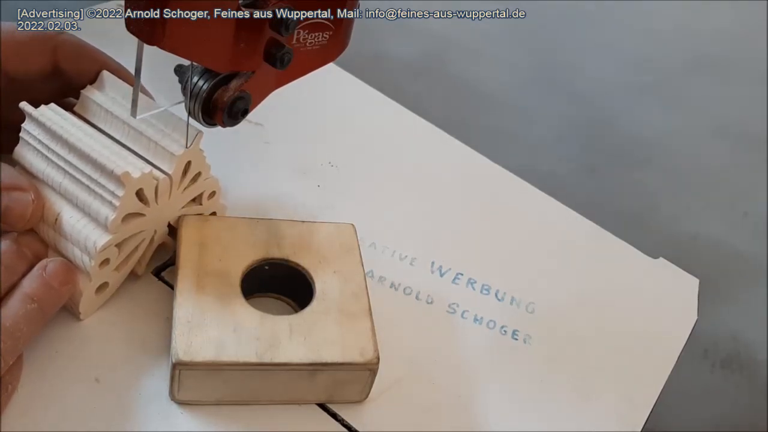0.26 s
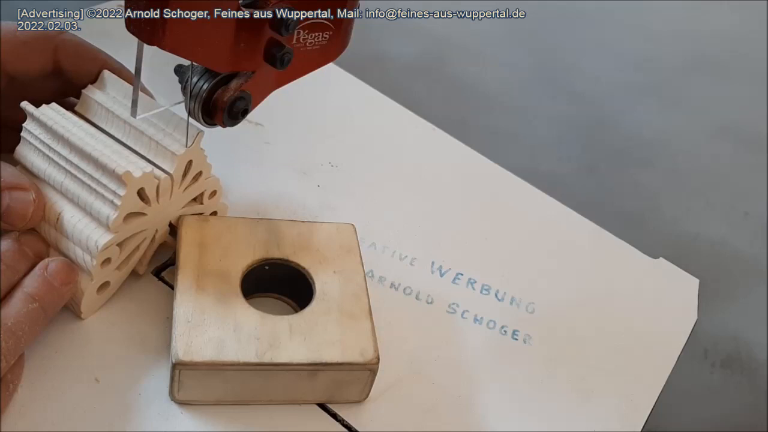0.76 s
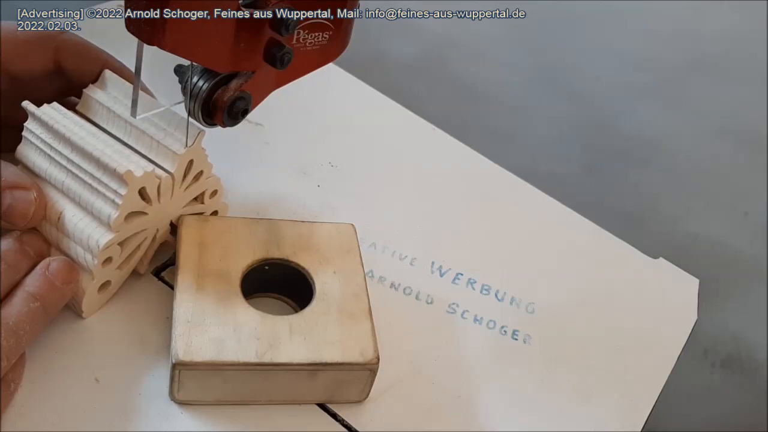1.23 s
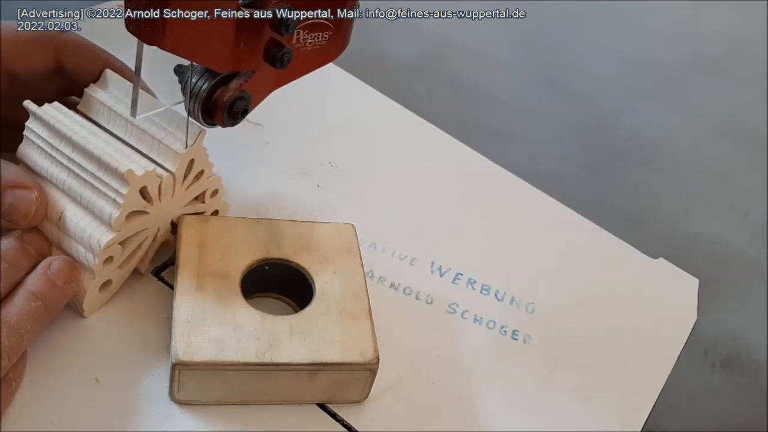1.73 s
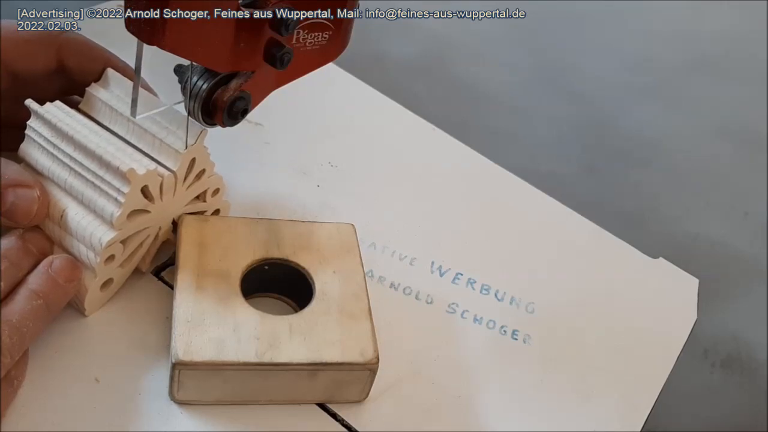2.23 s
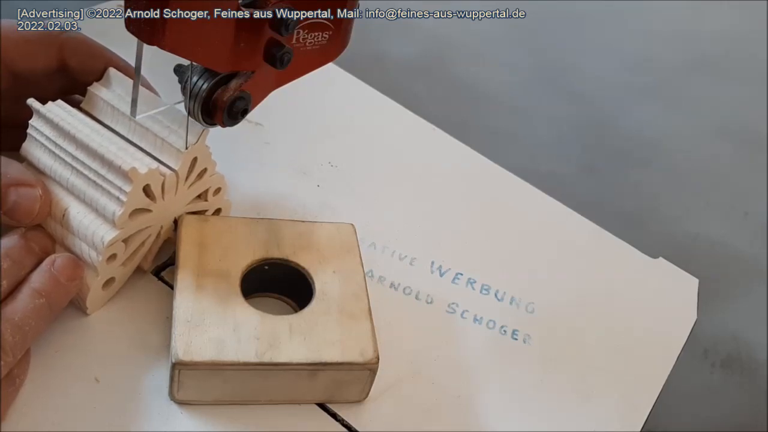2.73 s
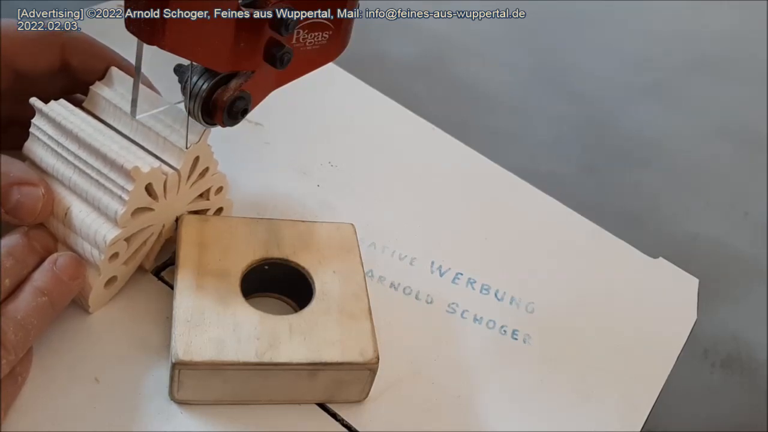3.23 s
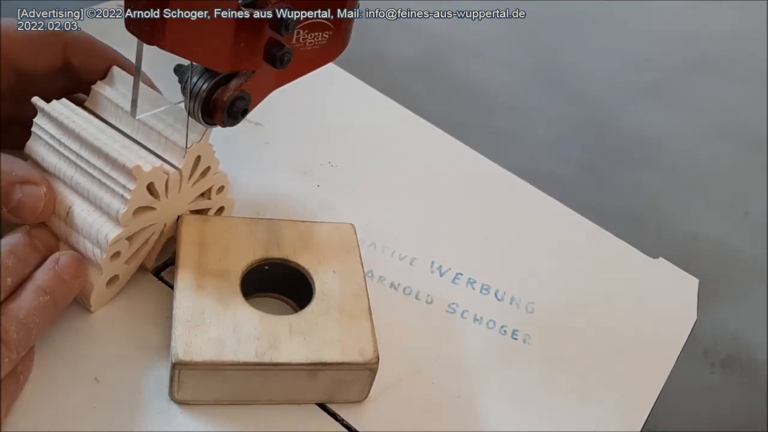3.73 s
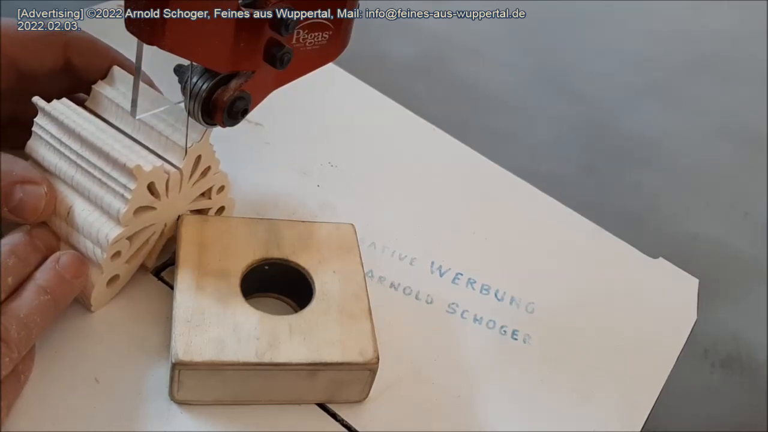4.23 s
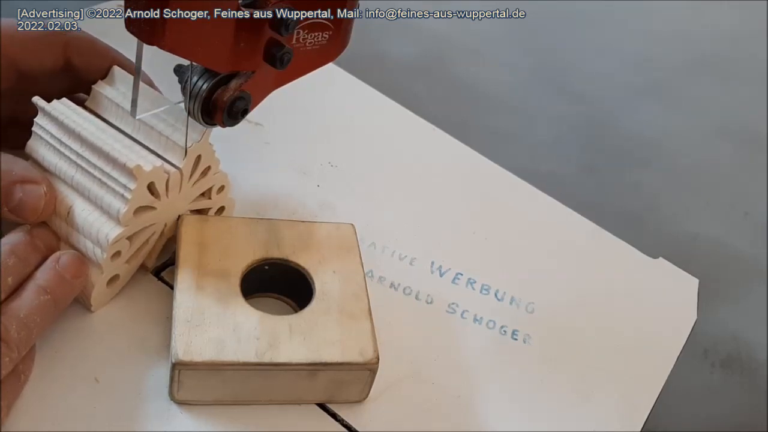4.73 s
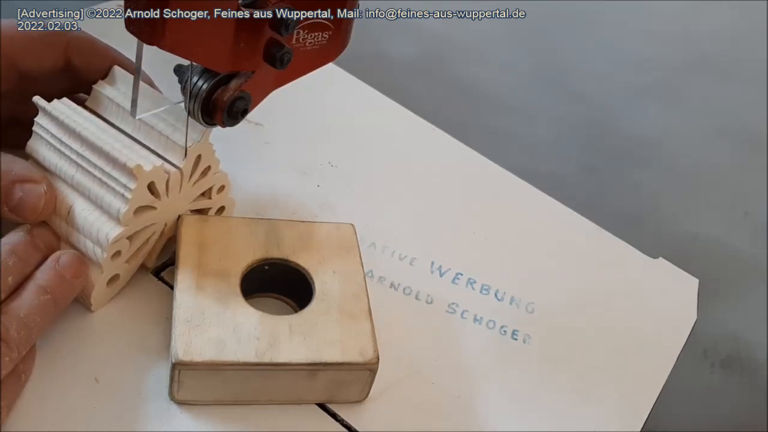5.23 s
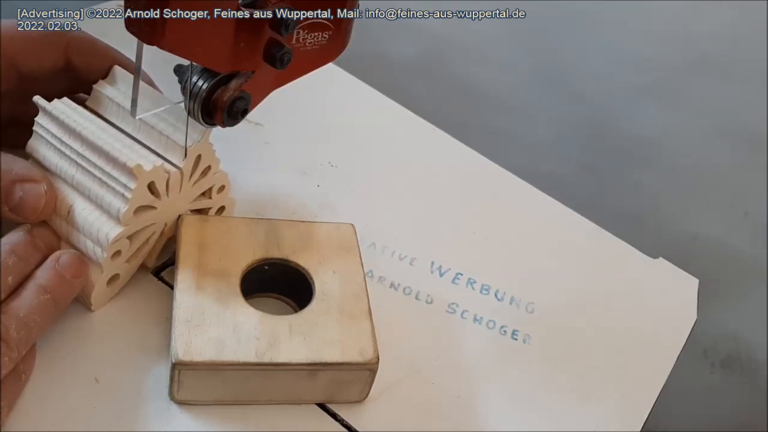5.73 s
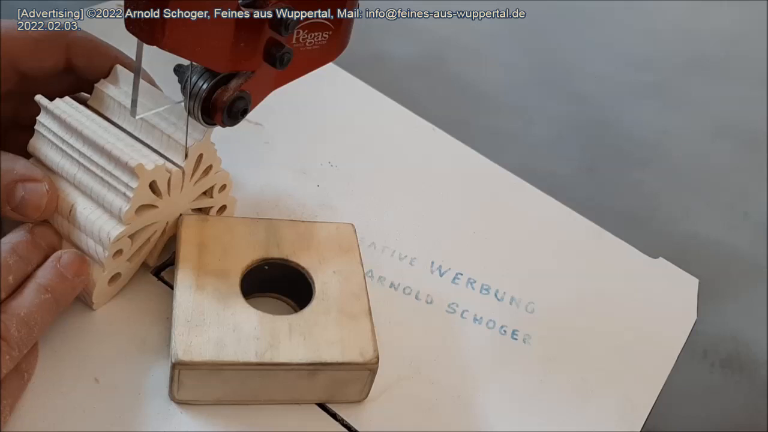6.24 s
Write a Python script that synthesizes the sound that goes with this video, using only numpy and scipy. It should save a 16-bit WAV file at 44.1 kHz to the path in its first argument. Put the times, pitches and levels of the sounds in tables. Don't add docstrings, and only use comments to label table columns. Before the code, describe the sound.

Harsh, gritty sawing starts at once, dense in the high range and with little bass, pulsing fast with the blade guide and broken by irregular tooth bites. Wood taps the table and the frame gives faint low thuds. The cut fades, the saw whirs and hums unloaded with a few clearer knocks, then a short new cut tears in with chirps. Close and dry, slightly gritty phone sound in a workshop.

```python
import sys
import numpy as np
from scipy import signal
from scipy.fft import rfft, irfft, next_fast_len
from scipy.io import wavfile
from scipy.ndimage import uniform_filter1d

SR = 44100
rng = np.random.default_rng(int(sys.argv[2]) if len(sys.argv) > 2 else 0)


def master_out(mix):
    frames = np.transpose(np.atleast_2d(mix))
    ceiling = np.clip(frames, -1, 1)
    pcm = np.round(ceiling * 32767).astype(np.int16)
    wavfile.write(sys.argv[1], SR, pcm)


def volts_from_db(level):
    exponent = np.asarray(level, float) / 20
    return 10 ** exponent


N = 285761
FFT_LEN = next_fast_len(N)
TIME_S = np.arange(N) / SR
FREQ_HZ = np.arange(FFT_LEN // 2 + 1) * SR / FFT_LEN

# (time [s], tooth pressure [dB], solid wood in kerf [dB])
FEED = [(0.0, -15.5, -3), (0.06, -22.5, 0), (0.5, -24, 1.5), (0.85, -21, 0.5), (1.7, -21, 1),
        (1.87, -19.5, -1), (1.98, -21, 0), (2.3, -20, 0), (2.85, -20.5, 0), (3.4, -18.5, -5.5),
        (3.95, -20, -8), (4.2, -25.5, -6), (4.45, -29.5, -10), (4.7, -38.5, -7.5), (6.225, -33.5, -6),
        (6.25, -24.5, -4.5), (6.38, -29, 2), (6.48, -30.5, -2)]
# (time [s], contact [0-1])
CONTACT = [
    (4.5, 0.24),
    (4.75, 0.49),
    (6.2, 0.5),
    (6.24, 0.98),
]
# (time [s], level [dB], half length [s])
BITES = [(0.037, -23, 0.0093), (0.09, -23.1, 0.0063), (0.24, -18.5, 0.0073), (0.347, -19, 0.0055),
         (0.412, -27.5, 0.0187), (0.49, -22.5, 0.013), (0.55, -26, 0.0097), (0.643, -25, 0.011),
         (0.709, -22, 0.0091), (0.887, -19.5, 0.012), (0.927, -19, 0.013), (1.025, -21.5, 0.0132),
         (1.069, -29, 0.0117), (1.116, -21, 0.012), (1.222, -19, 0.015), (1.307, -19.5, 0.0047),
         (1.395, -24.5, 0.018), (1.424, -28, 0.0059), (1.459, -22.5, 0.022), (1.589, -21, 0.0077),
         (1.722, -21.5, 0.01), (1.789, -22.5, 0.012), (1.859, -20.5, 0.021), (1.943, -27, 0.007),
         (2.038, -20.5, 0.022), (2.105, -19, 0.014), (2.159, -20.5, 0.01), (2.245, -18.5, 0.019),
         (2.343, -19, 0.0093), (2.449, -24, 0.015), (2.509, -21.5, 0.0096), (2.545, -22, 0.017),
         (2.633, -19, 0.0085), (2.716, -21, 0.013), (2.784, -18.5, 0.0072), (2.826, -21, 0.016),
         (2.856, -27, 0.0058), (2.949, -14.5, 0.0069), (2.987, -18, 0.0065), (3.075, -18, 0.016),
         (3.156, -20.5, 0.012), (3.218, -18, 0.011), (3.291, -19.5, 0.013), (3.333, -19.5, 0.0081),
         (3.422, -19.5, 0.0066), (3.461, -20, 0.0096), (3.492, -19.5, 0.012), (3.571, -18.5, 0.015),
         (3.733, -25, 0.01), (3.873, -23, 0.017), (3.93, -25, 0.0122), (3.997, -21, 0.014),
         (4.211, -28, 0.0103), (4.242, -30, 0.0064), (4.732, -30, 0.0097), (5.378, -31, 0.013),
         (5.53, -27.7, 0.009), (6.261, -23.5, 0.011), (6.325, -22.5, 0.007), (6.445, -28, 0.014)]
# (time [s], level [dB], half length [s])
SQUEALS = [(0.026, -23, 0.0075), (0.088, -30, 0.0067), (0.122, -29, 0.0096), (0.168, -21, 0.0067),
           (0.243, -19.5, 0.0086), (0.314, -17, 0.0088), (0.387, -20.5, 0.01), (0.493, -27, 0.015),
           (0.559, -24, 0.009), (0.653, -20.5, 0.011), (0.711, -17.5, 0.01), (0.784, -27, 0.025),
           (0.88, -27, 0.016), (0.922, -19.5, 0.014), (1.03, -21, 0.012), (1.123, -21.5, 0.0179),
           (1.222, -18, 0.012), (1.306, -21.5, 0.0062), (1.378, -23, 0.0149), (1.421, -22, 0.0061),
           (1.45, -21, 0.015), (1.588, -24, 0.0071), (1.728, -28, 0.021), (1.858, -17, 0.0099),
           (2.053, -22, 0.022), (2.099, -18, 0.0097), (2.23, -24, 0.019), (2.337, -26, 0.0119),
           (2.392, -31, 0.013), (2.441, -22, 0.0099), (2.48, -24, 0.0068), (2.524, -21, 0.0103),
           (2.642, -22.5, 0.0189), (2.819, -22, 0.039), (2.892, -21, 0.0091), (2.998, -24, 0.027),
           (3.059, -21, 0.022), (3.155, -22.4, 0.023), (3.192, -29, 0.0079), (3.228, -21, 0.0081),
           (3.261, -22, 0.0088), (3.34, -21, 0.011), (3.416, -29, 0.02), (3.466, -22, 0.011),
           (3.53, -21, 0.0082), (3.6, -23, 0.024), (3.655, -21.5, 0.013), (3.77, -22, 0.019),
           (3.826, -27, 0.0098), (3.87, -21.5, 0.0068), (3.915, -21.5, 0.013), (3.987, -21.5, 0.0092),
           (4.068, -25, 0.01), (4.112, -20.5, 0.0097), (4.182, -29.3, 0.0257), (4.292, -34, 0.021),
           (6.205, -33, 0.012), (6.289, -23, 0.027), (6.334, -26, 0.0099), (6.425, -28, 0.0073)]
# (time [s], level [dB], half length [s])
SPRAYS = [(0.025, -19, 0.0072), (0.094, -27, 0.0079), (0.164, -21.5, 0.024), (0.264, -16.5, 0.0095),
          (0.318, -23, 0.0104), (0.384, -21, 0.014), (0.49, -23, 0.0178), (0.552, -23, 0.012),
          (0.652, -18.5, 0.011), (0.705, -16.5, 0.0113), (0.89, -15.5, 0.022), (0.943, -22, 0.0171),
          (1.036, -18.5, 0.0167), (1.12, -17.5, 0.022), (1.214, -18.5, 0.017), (1.281, -18, 0.0061),
          (1.356, -22, 0.0066), (1.382, -19, 0.0072), (1.424, -20, 0.033), (1.525, -17.5, 0.0058),
          (1.572, -19.5, 0.0145), (1.648, -21.5, 0.0073), (1.708, -19.5, 0.0071), (1.765, -17.5, 0.016),
          (1.821, -24, 0.0104), (1.861, -17.5, 0.011), (2.022, -14, 0.0089), (2.095, -20, 0.014),
          (2.138, -16.5, 0.0081), (2.239, -20, 0.021), (2.34, -23, 0.007), (2.372, -24, 0.0085),
          (2.435, -18, 0.012), (2.507, -21, 0.04), (2.648, -19, 0.012), (2.713, -19.5, 0.0091),
          (2.783, -18.4, 0.011), (2.832, -19, 0.015), (2.947, -19, 0.019), (2.986, -18, 0.0063),
          (3.081, -20.5, 0.024), (3.156, -20, 0.0105), (3.182, -14, 0.0049), (3.228, -17, 0.013),
          (3.307, -22, 0.0074), (3.364, -21, 0.0081), (3.46, -18, 0.017), (3.492, -17, 0.0058),
          (3.56, -19, 0.016), (3.633, -22, 0.0097), (3.698, -15.5, 0.0068), (3.791, -17, 0.0085),
          (3.871, -20.5, 0.0073), (3.931, -23, 0.018), (3.994, -20, 0.0122), (4.051, -24.7, 0.02),
          (4.108, -19, 0.0075), (4.212, -28, 0.0232), (6.289, -17, 0.043), (6.424, -26, 0.0118)]
# (frequency [Hz], level [dB per Hz])
CUT_COLOUR = [(200, -85), (600, -23.5), (1300, -25.5), (1950, -21), (2500, -25), (2900, -28.5),
              (3300, -21.5), (3700, -12.5), (4100, -10.5), (4500, -16.5), (4850, -19), (5300, -15.5),
              (5750, -12.5), (6200, -10), (7500, -8.5), (11500, -12), (12500, -16.5), (14300, -13),
              (15500, -12)]
# (frequency [Hz], width [Hz], level against colour [dB])
CUT_MODES = [(3590, 100, 7), (3660, 35, 6), (3730, 35, 8), (3810, 60, 4), (1520, 70, 2), (1980, 70, -2),
             (11800, 150, -3), (4530, 50, 1), (4940, 45, 1), (5260, 120, -3), (6410, 50, 0), (6940, 130, 0),
             (7430, 60, -3), (7770, 50, -2), (10990, 80, -2), (11375, 140, -1), (13550, 180, -4),
             (15269, 11, 3)]
# (frequency [Hz], half width [Hz], level in solid wood [dB], slope [dB per dB of wood])
KERF = [(2410, 110, 2, -0.1), (3604, 70, 2, 0.4), (4280, 130, 0.1, 0.3), (2200, 50, -3, .3),
        (2650, 60, -4, .2), (3220, 60, -5, .1), (4150, 55, -7, .2), (4840, 55, -6, .6), (5870, 80, -7, -.3),
        (6400, 85, 1, -0.2), (7180, 380, 0.4, -0.4), (11260, 160, -1.5, -0.7), (11650, 150, 4, 0.7),
        (13000, 350, -0.2, -0.6), (13570, 200, 2.5, -0.2), (14500, 330, -3.5, -0.9),
        (15100, 150, 1.5, -0.5)]
# (frequency [Hz], half width [Hz], level [dB])
FRESH_KERF = [(1140, 320, 1.5), (3210, 200, 11), (4150, 70, -5), (5170, 130, 2.5), (6800, 140, 2),
              (7750, 170, -8), (10400, 150, 5.5), (11400, 550, -7), (14000, 300, 2.5), (15270, 120, -9)]
# (from [Hz], to [Hz], level in solid wood [dB], slope [dB per dB of wood])
GAPS = [(2100, 3350, 1.43, 0.27), (4250, 5150, 0.5, 0.28), (5150, 6000, 1.46, 0.2),
        (12500, 15750, 0.5, 0.27)]
NOTCH_GAP = 7950, 9330, 6.8, 2.05
# (time [s], gain [dB])
GAIN = [
    (0.0, 0.5),
    (0.8, 0.5),
    (1.6, -0.9),
    (3.2, -0.7),
    (4.2, -1.5),
    (5.2, 1.5),
    (5.6, 4),
    (6.0, 5),
    (6.22, 5),
    (6.34, -1.5),
]
# (frequency [Hz], level [dB per Hz])
WHEEL_COLOUR = [(250, -75), (700, -20.5), (1300, -12.5), (1900, -12), (2500, -14.5), (3250, -8.5),
                (4100, -7), (4500, -8), (6300, -5), (7600, -5.5), (9900, 0), (11000, -10), (12400, -9.5),
                (13000, -3.5), (13500, -11.5), (14300, -3.5), (15500, -12)]
# (frequency [Hz], width [Hz], level against colour [dB])
WHEEL_MODES = [(950, 40, -2), (2008, 9, 6), (3630, 170, 1), (6490, 150, -3), (6950, 100, -2),
               (7290, 120, -2), (11300, 110, -2), (11810, 60, -2), (12080, 150, -1), (13100, 300, -6),
               (13800, 200, -3), (14290, 110, 2), (15090, 100, 2)]
# (frequency [Hz], level [dB per Hz])
MOTOR_COLOUR = [(60, -80), (130, -13.5), (200, -14.5), (260, -9), (320, -6.5), (450, -2.5), (670, -11),
                (1200, -32), (2500, -42.5)]
# (frequency [Hz], width [Hz], level against colour [dB])
HOUSING_MODES = [(200, 4, 13), (313, 16, 5)]
# (frequency [Hz], level [dB per Hz])
FRAME_COLOUR = [(20, -42), (50, -14.5), (100, -9), (170, 0), (220, -3.5), (320, -16), (600, -84)]
# (time [s], peak [dB], pitch [Hz])
KNOCKS = [(0.234, -27.5, 428), (0.637, -26.5, 323), (1.194, -30, 313), (1.334, -29, 320), (1.616, -30, 487),
          (1.828, -26, 355), (2.022, -25.5, 536), (2.088, -31, 525), (2.504, -26.5, 375), (2.827, -27, 478),
          (2.981, -31, 501), (3.072, -24.5, 525), (3.195, -28, 410), (3.302, -30, 407), (3.485, -29, 418),
          (4.889, -31, 340), (5.427, -23, 326), (5.503, -29, 345), (5.597, -21, 317), (5.813, -26, 409),
          (5.989, -26, 266), (6.098, -30, 310), (6.245, -23, 412), (6.395, -28, 345)]
# (time [s], peak [dB], pitch [Hz])
THUMPS = [(0.427, -50, 90), (0.602, -50, 75.4), (0.706, -51, 53.8), (1.184, -50, 90), (1.387, -50, 80),
          (1.835, -51, 80.76), (3.847, -48, 80.7), (4.1, -62, 70), (4.496, -53, 100), (1.096, -48, 72.7),
          (1.309, -50, 59.1), (1.576, -39, 83.4), (2.011, -36.5, 83.4), (2.329, -43, 97.04),
          (2.484, -51, 72.7), (2.668, -57, 65), (2.811, -45, 64.6), (3.059, -37, 83.4), (3.451, -44, 90),
          (3.633, -52, 83.4), (3.734, -53, 99.34), (3.967, -47, 80.7), (4.269, -49, 96.9),
          (4.389, -63, 88.8), (4.718, -52, 53.8), (4.886, -43, 69), (5.673, -40, 75), (6.268, -48, 32.3),
          (6.268, -35, 78.1)]
# (time [s], level [dB], half length [s])
CHIRPS = [
    (6.255, -32, 0.006),
    (6.268, -29, 0.004),
    (6.28, -23.5, 0.0025),
    (6.292, -21.5, 0.0023),
    (6.302, -25, 0.0035),
    (6.325, -27, 0.0045),
    (6.346, -27, 0.004),
    (6.415, -31, 0.003),
    (6.423, -18.5, 0.0031),
    (6.446, -26, 0.004),
]
# (frequency [Hz], width [Hz], level [dB])
CHIRP_MODES = [(5300, 180, 5), (6860, 280, -1)]
# (frequency [Hz], phase [rad])
PORT_LEAD = [(0, 0.6), (350, 0.84), (800, 2), (1980, 5), (3190, -2), (3530, 0), (4480, -6.5), (6370, -3.5),
             (7060, 3), (7490, 1.5), (9470, 21), (10200, 20.5), (10900, 24.5), (13600, 34.5), (14800, 39),
             (16200, 54)]
# (frequency [Hz], level [dB])
PORT_BALANCE = [(30, -5), (80, -3), (170, -1), (380, 2.5), (700, 3.8), (1400, 1.2), (4400, .9), (9000, 2.2),
                (15000, -.3)]
# (frequency [Hz], share [0-1])
PORT_SHARE = [(60, .3), (200, .75), (380, .5), (700, .15), (1500, .42), (2500, .25), (3600, .6), (6000, .5),
              (9000, .75), (11000, .5), (12300, .25), (15000, .45)]
# (frequency [Hz], level [dB])
PORT_NOTCH = [(60, 0), (7750, 0), (8050, -10), (8250, -11), (8450, -16), (8750, -13), (9150, -14),
              (9450, -9), (9900, -6), (10900, 0)]
# (frequency [Hz], level [dB])
THRESHOLD = [(40, -24), (150, -27), (600, -20), (1000, -16.5), (2200, -10), (2800, -6.5), (4300, -3.5),
             (5900, -5), (6800, -7), (8100, -3), (9100, -2), (9500, -5), (10500, -6), (12500, -10),
             (15000, -10)]

PART_EDGES_HZ = 900, 3200, 4200, 5200, 8600, 12400
TOP_HZ = 15760
ROLLER_HZ = 70.62
ROLLER_LEAD_RAD = 3.0, 3.0, 3.0, -1.0, 3.1, 3.1
ROLLER_GRIP = 0.4, 0.75, 0.3, 0.81, 1.0, 0.8
GRAIN_SWELL_DB = 1.0, 0.7, 0.63, 0.6, 0.78, 0.7
LAYER_DB = -13, -0.5, -5.5, 2.2, 3.5
FRESH_CUT_S, FRESH_SHIFT_DB = 6.225, (-1, -4.5, -3.5, 0, -2)
SWELL_DB = -16, -1.5, -3, -2
MOTOR_DB, WHEEL_DB, FRAME_DB = -42, -40, -55
LOAD_DB, LOAD_RANGE_DB = -23.5, 1.0
MOTOR_FREED_DB, FRAME_FREED_DB = 0.6, 8.5


def along(table):
    hz, value = np.transpose(table)
    return np.interp(np.log(np.maximum(FREQ_HZ, 1)), np.log(hz), value)


def curves(table):
    s, *columns = np.transpose(table)
    return [np.interp(TIME_S, s, column) for column in columns]


def filtered(spectrum, response):
    return irfft(spectrum * response, FFT_LEN)[:, :N]


def walk(rate_hz):
    hold = int(SR / rate_hz)
    level = np.repeat(rng.standard_normal(N // hold + 1), hold)
    level = uniform_filter1d(uniform_filter1d(level, hold), hold)[:N]
    return level / level.std()


def body(colour, modes):
    rings = 0
    for hz, width_hz, db in modes:
        damping = 1j * FREQ_HZ * width_hz
        rings = rings + volts_from_db(db) * damping / (hz ** 2 - FREQ_HZ ** 2 + damping)
    return volts_from_db(along(colour)) * (1 + rings)


def heard(push, response, lo_hz, hi_hz):
    power = np.abs(response) ** 2
    band = (FREQ_HZ > lo_hz) & (FREQ_HZ < hi_hz)
    gain = response / np.sqrt(np.sum(power[band]) / len(FREQ_HZ))
    both, left, right = rfft(push, FFT_LEN) * gain
    share = np.clip(along(PORT_SHARE), 0, 1)
    alike, apart = np.sqrt(share), np.sqrt(1 - share)
    lag = np.exp(-1j * np.interp(FREQ_HZ, *np.transpose(PORT_LEAD)))
    tilt = volts_from_db(along(PORT_BALANCE) / 2)
    left_port = (alike * both + apart * left) * tilt
    right_port = (alike * both * lag + apart * right) / tilt
    return np.sqrt(2) * irfft([left_port, right_port], FFT_LEN)[:, :N]


def chips(scatter_db):
    tear = rng.standard_normal((3, N)) * volts_from_db(scatter_db * rng.exponential(size=(3, N)))
    return tear / tear.std()


def snags(rate_hz, fade_s):
    catch = (rng.random(N) < rate_hz / SR) * rng.exponential(size=N)
    pull = signal.lfilter([1], [1, -np.exp(-1 / (fade_s * SR))], catch)
    pull = uniform_filter1d(pull, SR // 400)
    return (pull - pull.mean()) / pull.std()


def swell_power(table, stretch):
    power = np.zeros(N)
    for s, db, half_s in table:
        near = slice(max(int((s - 0.1) * SR), 0), int((s + 0.1) * SR))
        power[near] += volts_from_db(2 * db) * 0.5 ** (((TIME_S[near] - s) / (stretch * half_s)) ** 2)
    return power


def roller(depth, sharp, lead_rad):
    turn = np.cos(2 * np.pi * ROLLER_HZ * TIME_S + lead_rad)
    throb = 1 + depth * np.exp(sharp * (turn - 1))
    return throb / np.sqrt(np.mean(throb ** 2))


def cutting_forces():
    contact, = curves(CONTACT)
    pressure_db, solid_db = curves(FEED)
    layers_db = np.array(LAYER_DB)[:, None] + np.outer(FRESH_SHIFT_DB, TIME_S > FRESH_CUT_S)
    layers_db[2] += solid_db
    steady = volts_from_db(pressure_db + layers_db + 4.0) * contact
    growl, ring, hiss, sizzle = volts_from_db(2 * np.array(SWELL_DB))
    bites = swell_power(BITES, stretch=0.96)
    squeals = hiss * swell_power(SQUEALS, stretch=0.81)
    sprays = sizzle * swell_power(SPRAYS, stretch=0.71)
    swells = [growl * bites, ring * bites, np.zeros(N), squeals, sprays]
    force = np.sqrt(steady ** 2 + swells)
    upper = np.sqrt(steady[-1] ** 2 * volts_from_db(0.5) + volts_from_db(-1.5) * sprays)
    return [*force[:-1], volts_from_db(-4.0) * force[-1], volts_from_db(-1.9) * upper]


def cutting():
    blade = body(CUT_COLOUR, CUT_MODES) * volts_from_db(along(PORT_NOTCH))
    shared = snags(rate_hz=70, fade_s=0.0026)
    over = [1, *(np.clip((FREQ_HZ - hz) / 200 + 0.5, 0, 1) for hz in PART_EDGES_HZ[1:]), 0]
    edges_hz = [*PART_EDGES_HZ, TOP_HZ]
    out = 0
    for k, force in enumerate(cutting_forces()):
        throb = roller(depth=0.74, sharp=0.71, lead_rad=ROLLER_LEAD_RAD[k]) - 1
        chatter = 0.7 * shared + 0.7 * snags(rate_hz=60, fade_s=0.004)
        flutter = volts_from_db(1.1 * np.minimum(chatter, 2.6) + GRAIN_SWELL_DB[k] * walk(90))
        push = chips(scatter_db=2.0) * force * flutter * (1 + ROLLER_GRIP[k] * throb)
        part = blade * np.sqrt(over[k] - over[k + 1])
        out = out + heard(push, part, edges_hz[k], edges_hz[k + 1])
    return out


def kerf(x):
    spectrum, solid_db = rfft(x, FFT_LEN), curves(FEED)[1]

    def bell(hz, half_hz):
        return filtered(spectrum, np.exp(-((FREQ_HZ - hz) / half_hz) ** 2))

    old = sum(bell(hz, half_hz) * (volts_from_db(db + slope * solid_db) - 1) for hz, half_hz, db, slope in KERF)
    new = sum(bell(hz, half_hz) * (volts_from_db(db) - 1) for hz, half_hz, db in FRESH_KERF)
    return x + np.where(TIME_S > FRESH_CUT_S, new, old)


def running():
    gain_db, = curves(GAIN)
    contact, = curves(CONTACT)
    freed = 1 / (1 + np.exp((curves(FEED)[0] - LOAD_DB) / LOAD_RANGE_DB))
    motor_db = gain_db + MOTOR_DB + MOTOR_FREED_DB * freed
    frame_db = gain_db + FRAME_DB + FRAME_FREED_DB * freed
    shake = walk(21.91)
    drone = rng.standard_normal((3, N)) * volts_from_db(motor_db + 1.0 * shake + 1.53 * walk(35))
    rumble = rng.standard_normal((3, N)) * volts_from_db(frame_db - 2 + 4.5 * walk(24))
    hiss = chips(scatter_db=1.5) * volts_from_db(gain_db + WHEEL_DB + 0.77 * shake)
    hiss = hiss * roller(depth=0.32, sharp=1.1, lead_rad=-0.66)
    wheels = heard(hiss, body(WHEEL_COLOUR, WHEEL_MODES) * volts_from_db(along(PORT_NOTCH)), 900, 2640)
    singing = filtered(rfft(wheels, FFT_LEN), FREQ_HZ > 3200)
    damped = wheels - 0.55 * contact * singing
    motor = heard(drone, body(MOTOR_COLOUR, HOUSING_MODES), 150, 990)
    frame = heard(rumble, volts_from_db(along(FRAME_COLOUR)), 60, 280)
    return motor + frame + damped


def fill_gaps(x):
    spectrum, solid_db = rfft(x, FFT_LEN), curves(FEED)[1]
    thinnest_db = np.clip(np.minimum.accumulate(solid_db), -5.5, 0)
    wood_db = [solid_db] * len(GAPS) + [thinnest_db]
    out = x
    for (lo_hz, hi_hz, db, slope), wood in zip([*GAPS, NOTCH_GAP], wood_db):
        gap = filtered(spectrum, (FREQ_HZ > lo_hz) & (FREQ_HZ < hi_hz))
        out = out + gap * (volts_from_db(db + slope * wood) - 1)
    return out


def knocks():
    out, t = np.zeros(N + SR), TIME_S[:SR // 20]
    fade = t / 0.0035
    for s, peak_db, hz in KNOCKS:
        i = int(s * SR)
        out[i:i + len(t)] += volts_from_db(peak_db - 2.5) * fade * np.exp(1 - fade) * np.sin(2 * np.pi * hz * t)
    return np.array([volts_from_db(2.0) * out[:N], volts_from_db(-3.0) * np.roll(out, 14)[:N]])


def thumps(width_s, lean_db):
    out, t = np.zeros((2, N + SR)), TIME_S[:SR // 10] - 4 * width_s
    quarter = np.array([[np.pi / 2], [0]])
    knock = np.exp(-(t / 0.0026) ** 2) * np.cos(2 * np.pi * 300 * t)
    for s, peak_db, hz in THUMPS:
        i = int(s * SR)
        swing = np.cos(2 * np.pi * hz * t - quarter)
        jolt = volts_from_db(peak_db) * 2 * np.exp(-(t / width_s) ** 2) * swing
        out[:, i:i + len(t)] += jolt + volts_from_db(peak_db - 9) * knock
    return out[:, :N] * volts_from_db(np.array([[-lean_db], [lean_db]]))


def chirps():
    rings = sum(volts_from_db(db) / (1 + ((FREQ_HZ - hz) / width_hz) ** 2) for hz, width_hz, db in CHIRP_MODES)
    bursts = rng.standard_normal((3, N)) * np.sqrt(swell_power(CHIRPS, stretch=0.91))
    return heard(bursts, rings, 4500, 7800)


def scene():
    saw = fill_gaps(kerf(cutting()) + running())
    return saw + knocks() + thumps(width_s=0.007, lean_db=2.5) + chirps()


def thin_spectrum(x, luck_db, size=1024, count=10):
    offset = 742
    window = np.sin(np.pi * (np.arange(2 * size) + 0.5) / (2 * size))
    pair = np.pad([x[0] + x[1], x[0] - x[1]], [(0, 0), (offset, 0)]) / 2
    hz, _, z = signal.stft(pair, SR, window=window, nperseg=2 * size)
    power = np.abs(z) ** 2
    luck = rng.standard_normal((size // count + 1, z.shape[2] + 1))
    luck = (luck[:, 1:] + luck[:, :-1]) / np.sqrt(2)
    luck = np.repeat(luck, count, axis=0)[:size + 1]
    threshold_db = np.interp(hz, *np.transpose(THRESHOLD))[:, None] + luck_db * luck
    step = power.mean(axis=(0, 1)) * volts_from_db(2 * threshold_db)
    kept = signal.istft(z * (power > step), SR, window=window, nperseg=2 * size)[1]
    mid, side = kept[:, offset:][:, :N]
    return np.array([mid + side, mid - side])


def top_cut(x):
    return signal.sosfilt(signal.butter(12, 16650, fs=SR, output="sos"), x)


def record(dry):
    limited = filtered(rfft(dry, FFT_LEN), FREQ_HZ < TOP_HZ)
    mix = np.clip(thin_spectrum(limited, luck_db=5.6), -1, 1)
    return top_cut(mix)


dry = scene()
out = record(dry)
master_out(out)
```